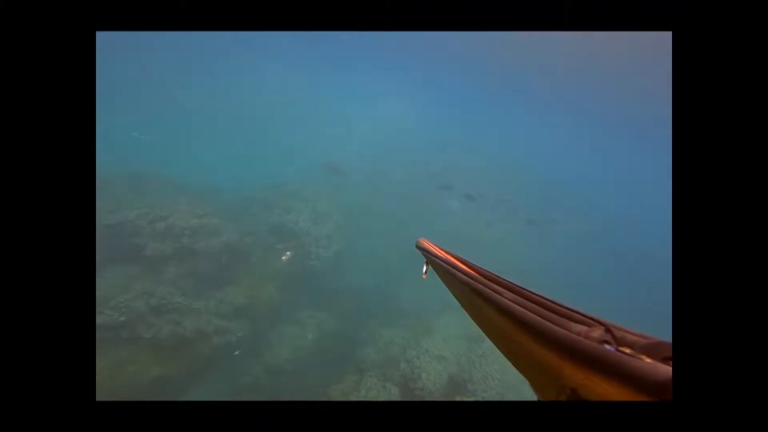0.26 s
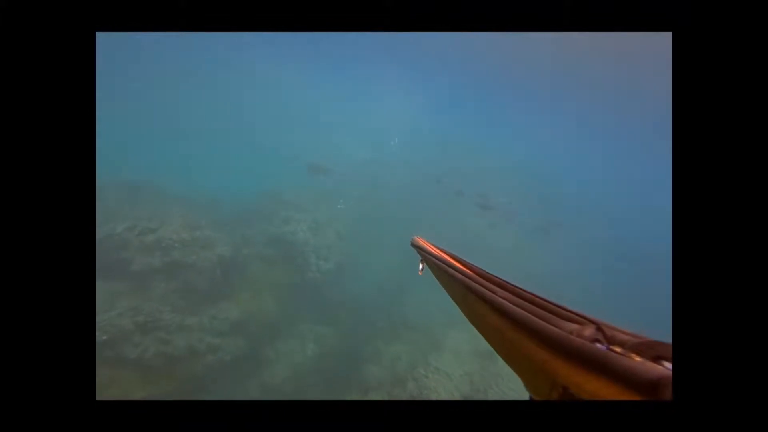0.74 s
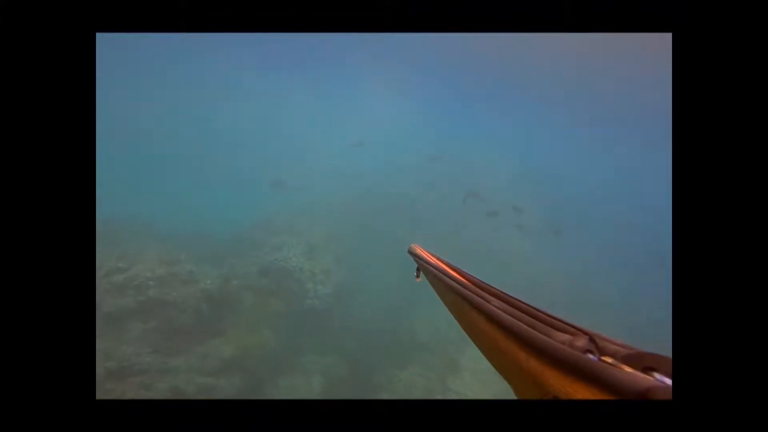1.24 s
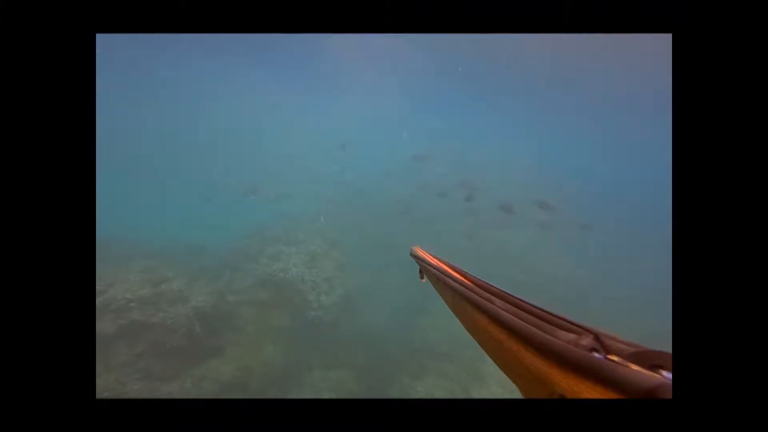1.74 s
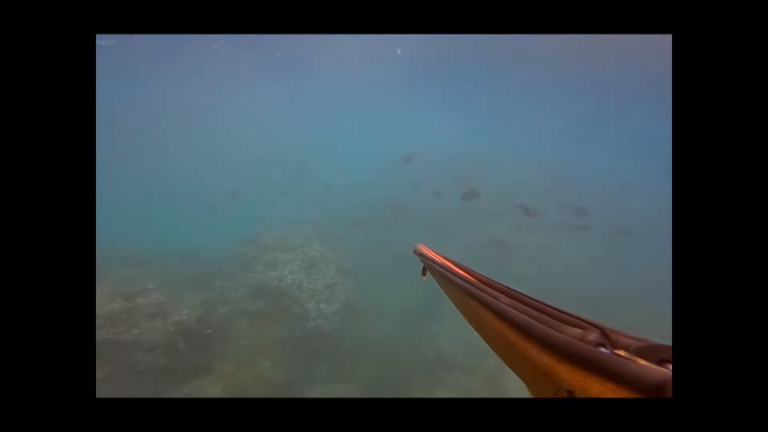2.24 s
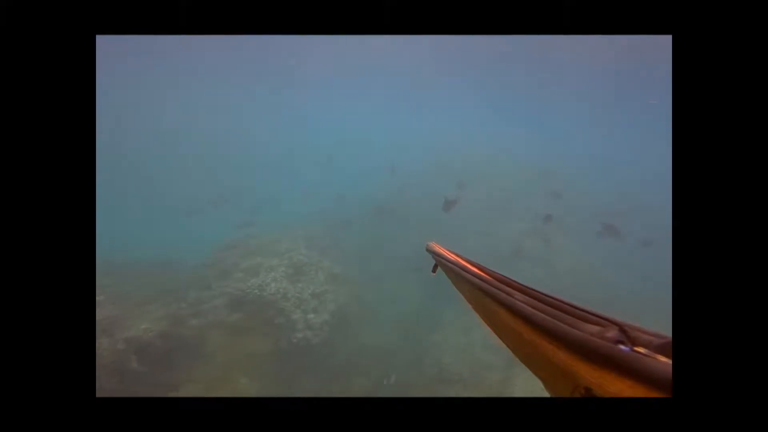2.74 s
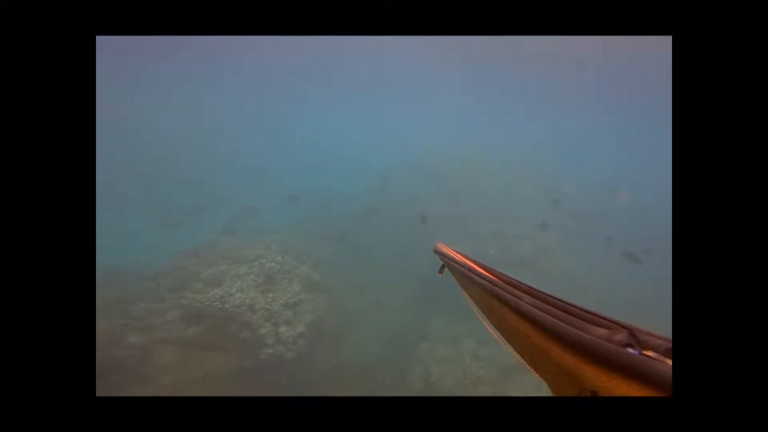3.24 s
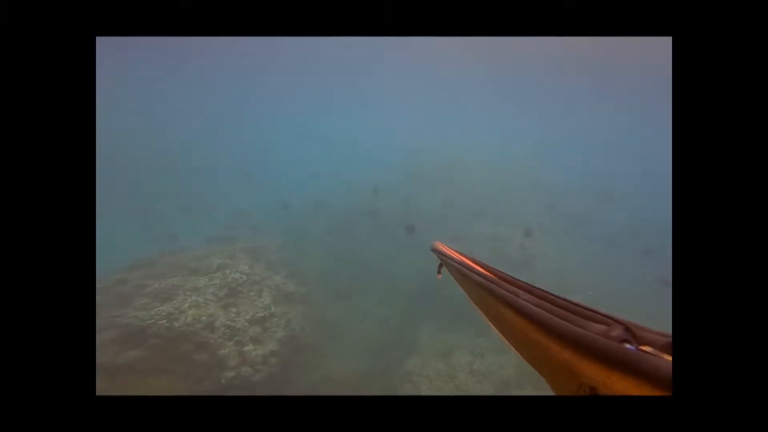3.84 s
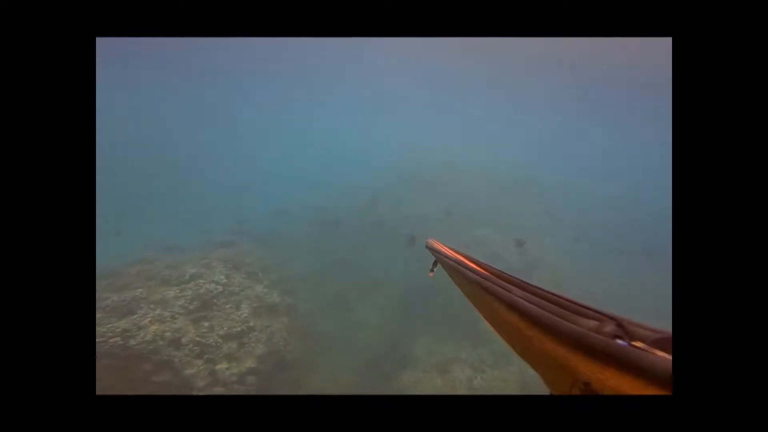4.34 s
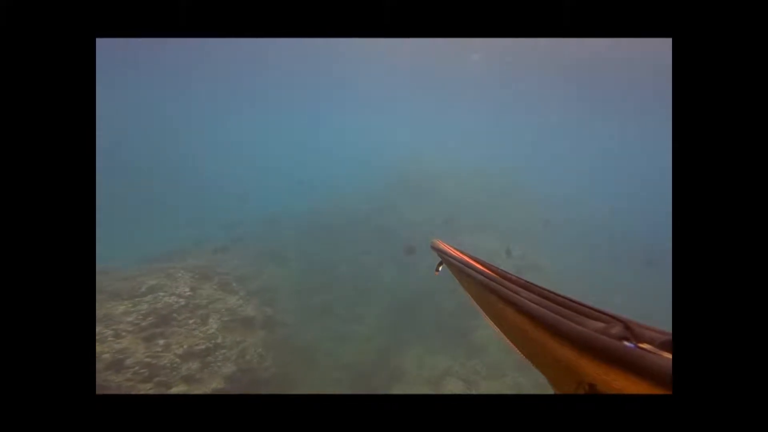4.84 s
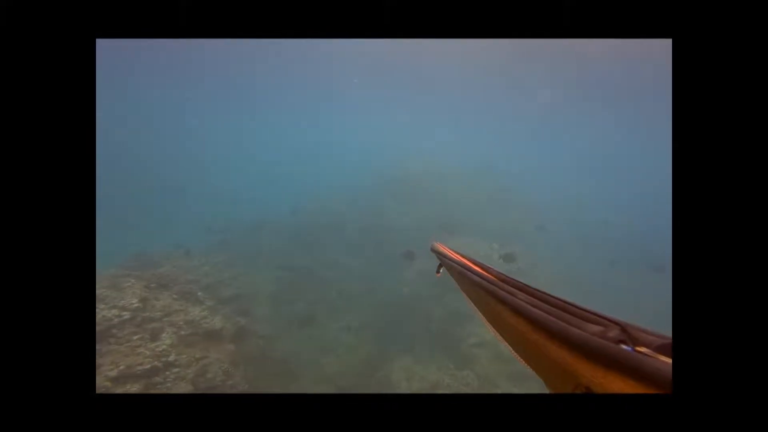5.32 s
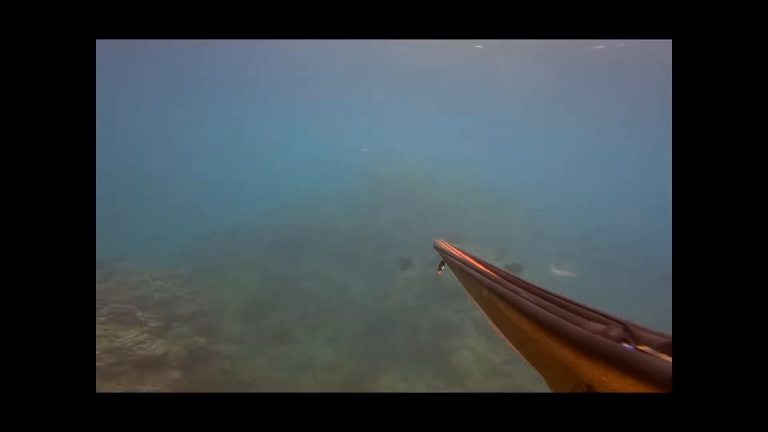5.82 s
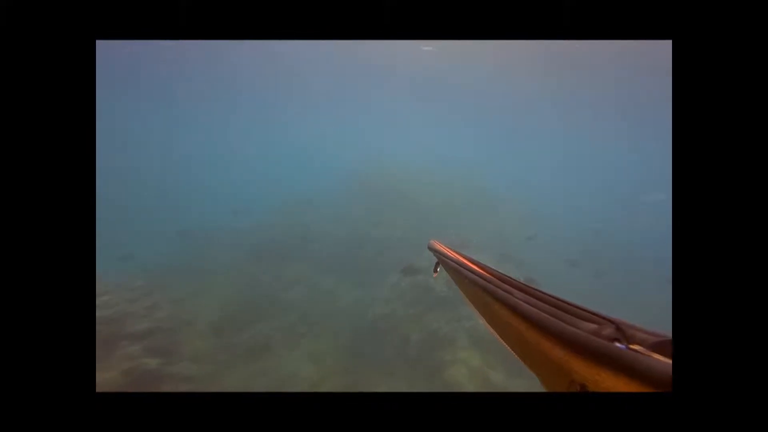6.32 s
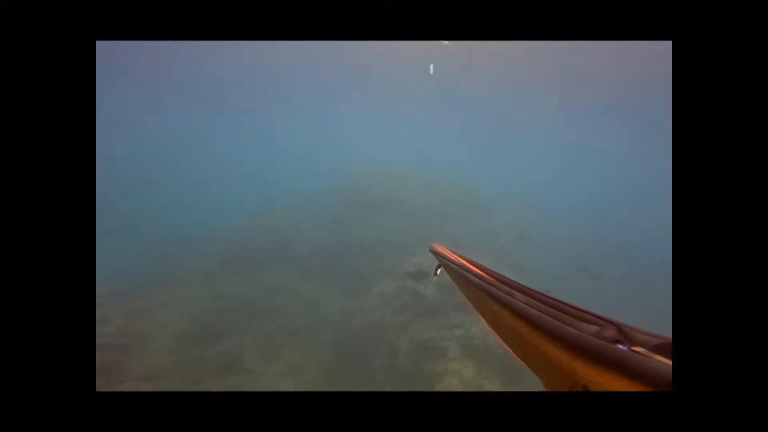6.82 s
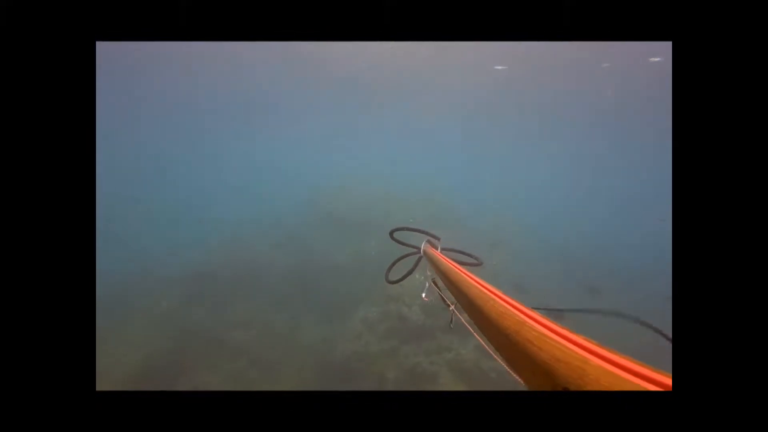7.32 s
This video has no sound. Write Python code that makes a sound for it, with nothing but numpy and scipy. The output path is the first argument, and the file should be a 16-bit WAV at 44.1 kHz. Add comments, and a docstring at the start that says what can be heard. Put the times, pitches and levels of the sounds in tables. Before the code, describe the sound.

Underwater over a reef, heard from inside a sealed camera housing. Snapping shrimp make a steady hissing crackle with sharp near clicks, above a deep wavering throb and soft turbulence. Dull knocks and small bubble blips come now and then. Near the end a close speargun fires: rubbery rasp, hard crack and rattle, a low jolt and a short rush of water, then the crackle fades.

```python
"""Speargun shot over a reef

Underwater, heard by a diver's camera in a sealed housing, through two sound ports. Under it all lie a
deep wavering throb, drone and turbulence. Shrimp snap near and far as noise bursts ringing in the shell.
Dull knocks and small bubbles are dying sines. A rubber-band speargun fires: a rasp of wobbling tones,
a crack and rattle of noise, a recoil jolt and a rush of water, after which the crackle sinks away."""
import sys
import numpy as np
from scipy import signal
from scipy.fft import rfft, irfft, next_fast_len
from scipy.io import wavfile
from scipy.ndimage import uniform_filter1d

SR = 44100
rng = np.random.default_rng(int(sys.argv[2]) if len(sys.argv) > 2 else 0)


def generate_wav(signal):
    """Clip the signal to [-1, 1] and save it as 16-bit WAV at the path in sys.argv[1]."""
    frames = np.transpose(np.atleast_2d(signal))
    scaled = np.clip(frames, -1, 1) * 32767
    pcm = np.round(scaled).astype(np.int16)
    wavfile.write(sys.argv[1], SR, pcm)


N = 333837
OPPOSITE = np.array([[1], [-1]])   # a signal that moves the two ports against each other


def from_db(db):
    """Amplitude factor of a level in dB."""
    return 10 ** (np.asarray(db) / 20)


def rms_one(x):
    """Scale to an RMS of one."""
    return x / np.sqrt(np.mean(x ** 2) + 1e-20)


def in_time(rows):
    """Turn rows that start with a time into one curve of straight lines per remaining column."""
    s, *columns = np.transpose(rows)
    return [np.interp(np.arange(N) / SR, s, c) for c in columns]


def band(x, low_hz, high_hz):
    """Keep the band between two frequencies."""
    sos = signal.butter(2, [low_hz, min(high_hz, .45 * SR)], "band", fs=SR, output="sos")
    return signal.sosfilt(sos, x)


def stereo_noise():
    """White noise, independent in each of two channels."""
    return rng.standard_normal((2, N))


def drift(rate_hz):
    """Random wander of RMS 1, mostly slower than rate_hz."""
    step = 40   # samples between the drawn points
    r = np.exp(-2 * np.pi * rate_hz * step / SR)
    draws = rng.standard_normal(N // step + 2002)
    slow = signal.lfilter([1], [1, -2 * r, r * r], draws)[2000:]
    return np.interp(np.arange(N) / step, np.arange(len(slow)), rms_one(slow))


def add(out, s, sound):
    """Mix a sound in at a time in seconds."""
    at = int(s * SR)
    out[..., at:at + sound.shape[-1]] += sound[..., :N - at]


def rings(events, rise, attack_s, side_db, rough):
    """Each event is a dying, slightly unsteady sine; side_db sets the quarter-cycle part between ports."""
    out, t = np.zeros((2, N)), np.arange(SR // 5) / SR
    for s, level_db, hz, t60 in events:
        wobble = rough * rms_one(uniform_filter1d(rng.standard_normal(len(t)), size=150))
        phase = 2 * np.pi * hz * t * (1 + rise * t / t60) + wobble
        shape = from_db(level_db - 60 * t / t60) * (1 - np.exp(-(t / attack_s) ** 2))
        between = from_db(side_db) * np.cos(phase) * OPPOSITE
        add(out, s, -shape * (np.sin(phase) - between))
    return out


# Gun parts, line and shaft rattling close by. Each row: start in seconds, relative level in dB,
# low thud and treble against the rattle in dB, 60 dB decay of the middle band in seconds.
RATTLE = [(7.164, -32, 7, -4, 0.031), (7.1743, -23, 3, -9.5, 0.031), (7.186, -26.5, 3.5, 4.5, 0.033),
          (7.1944, -20.5, 3, -6, 0.06), (7.2029, -4, -5, -1, 0.03), (7.208, -16, 1.5, -9, 0.02),
          (7.2136, -36, 4, -23, 0.1), (7.2382, -27, 5, -24, 0.054), (7.247, -34, 20, -10, 0.013),
          (7.264, -25.5, 11, -27, 0.019), (7.2694, -34, 5, -12, 0.026), (7.2839, -26, -19, -5.5, 0.034),
          (7.294, -47, 15, -8, 0.056), (7.3013, -44, 13, 5, 0.037), (7.309, -34, -11, -19, 0.02),
          (7.321, -47, 11, -21, 0.035), (7.328, -55, 4, -19, 0.04), (7.344, -45, 9, -1, 0.032),
          (7.3523, -48, -3, -19, 0.021), (7.3635, -39, -14, -12, 0.03), (7.373, -52, 2, 5, 0.029),
          (7.394, -52.5, 9, 8, 0.034), (7.433, -55, 0, 5, 0.029), (7.4553, -53, 10, 1, 0.044),
          (7.4817, -49, 7, -17, 0.03), (7.493, -45, -2, -24, 0.03), (7.5114, -58, -9, -19, 0.027)]


def rattle():
    """Hard parts collide: bursts of noise in low, middle and treble bands, dying faster the higher they are."""
    out, t = np.zeros((3, 2, N)), np.arange(SR // 8) / SR
    for s, level_db, thud_db, treble_db, t60 in RATTLE:
        fall_db = -60 * t / t60
        low_db = thud_db + 9.5 + 0.5 * fall_db
        high_db = treble_db + 7.0 + 1.24 * fall_db
        levels = from_db(level_db + np.array([low_db, 6.0 + fall_db, high_db]))
        add(out, s, rng.standard_normal((3, 2, len(t))) * levels[:, None])
    low, middle, high = out
    body = band(band(low, 435, 1000), 300, 1680)
    thud = from_db(9.5) * band(low[0], 60, 153.7)   # the same at both ports
    clatter = band(band(middle, 1060, 3220), 700, 8600)
    treble = band(band(high, 4300, 6000), 3830, 9000)
    top = from_db(-26) * band(band(high, 9000, 10500), 6000, 11000)
    return body + thud + clatter + treble + top


def shot_crack():
    """The sharp crack of the shot: one very short burst of the highest treble."""
    out, t = np.zeros((2, N)), np.arange(SR // 8) / SR
    burst = band(rng.standard_normal((2, len(t))), 9000, 17000)
    add(out, 7.202, from_db(-43 - 60 * t / 0.039) * burst)
    return out


# Rubber bands whipping forward, close by. Each row: time in seconds, relative level in dB.
BANDS = [(7.165, -73), (7.177, -23), (7.187, -16.5), (7.199, -11.5), (7.209, -12.5), (7.219, -30),
         (7.24, -57), (7.3, -100)]
# Tones of that rasp. Each row: pitch in Hz, wobble rate in Hz, relative level in dB,
# part between the ports against the part alike at both in dB.
BAND_TONES = [(129, 56, 0.5, -7.5), (319.5, 66, -19, 20), (508, 34, -4.5, -6), (702, 45, -1.5, 0),
              (1075, 90, -13, -1), (1760, 130, -20.5, 2)]
BAND_WOBBLE = 0.54   # RMS unsteadiness of the phase (radians)


def rubber_bands():
    """Stretched rubber snaps back: fast phase wobble roughens a handful of tones into a rasp."""
    twang = 0
    for hz, wobble_hz, db, side_db in BAND_TONES:
        phase = 2 * np.pi * hz * np.arange(N) / SR + BAND_WOBBLE * drift(wobble_hz)
        alike, between = np.sqrt(2) * np.sin(phase), np.sqrt(2) * np.cos(phase)
        twang = twang + from_db(db) * (alike + from_db(side_db) * between * OPPOSITE)
    released = np.arange(N) > BANDS[0][0] * SR
    return from_db(in_time(BANDS)[0]) * released * twang / 2


WAKE_S, WAKE_DB, WAKE_T60_S = 7.21, -31.5, 0.35   # start, starting RMS level, 60 dB decay


def shaft_wake():
    """The shaft leaves a smooth rush of water: band noise that dies away."""
    since = np.arange(N) / SR - WAKE_S
    level = (since > 0) * from_db(WAKE_DB - 60 * np.abs(since) / WAKE_T60_S)
    return level * rms_one(band(stereo_noise(), 550, 2300))


# The shot jerks the housing on its mount. Each row: start in seconds, level before the attack in dB,
# pitch in Hz, 60 dB decay in seconds.
RECOIL = [(7.208, -5, 35.1, 0.52)]
# It also rings the hum between the ports. Columns as above.
RECOIL_HUM = [(7.198, -31.5, 335, 0.14)]


def recoil():
    """The jolted mount swings as a dying low sine, with an unsteady hum mostly between the ports."""
    jolt = rings(RECOIL, rise=0, attack_s=0.0029, side_db=-15, rough=0)
    return jolt + rings(RECOIL_HUM, rise=0, attack_s=0.0051, side_db=19, rough=0.93)


# Deep throb of the housing on its mount, swelling and fading irregularly. Each row: time in seconds,
# relative level in dB, pitch in Hz.
THROB = [(0.0, -30, 38.2), (0.12, -42, 38.1), (0.17, -25.5, 36.8), (0.53, -36, 34.2), (0.63, -27.5, 37.9),
         (0.86, -35.5, 39.5), (1.01, -25.5, 38.37), (1.16, -33, 38.43), (1.43, -18, 37.06),
         (1.5, -24, 36.93), (1.62, -22, 42.7), (1.75, -24.5, 38.2), (1.87, -19.5, 38.5), (1.98, -29, 38.04),
         (2.04, -18.5, 38.4), (2.09, -24.5, 38.74), (2.26, -31, 36.18), (2.38, -15.5, 37.2),
         (2.46, -32, 36.27), (2.51, -23.5, 34.88), (2.61, -40.5, 37.53), (2.74, -21, 34.56),
         (2.78, -27.5, 34.25), (2.91, -16, 37.23), (2.99, -29.5, 37.24), (3.16, -19, 37),
         (3.27, -20.5, 38.37), (3.6, -28, 38.3), (3.65, -18, 38.63), (3.73, -22, 42.33),
         (3.79, -31.5, 41.9), (3.9, -21, 41.4), (4.07, -31.5, 40.3), (4.13, -44, 42.27), (4.26, -21, 42.32),
         (4.32, -36, 42.2), (4.49, -21, 42.9), (4.74, -37, 38.94), (4.81, -25, 39.67), (4.91, -24.5, 39.05),
         (4.98, -23.5, 37.16), (5.23, -18.5, 35.61), (5.27, -27.5, 35.5), (5.37, -22.5, 35.7),
         (5.99, -21.5, 35.67), (6.13, -24.5, 32.78), (6.16, -31.5, 32.9), (6.41, -25, 32.95),
         (6.47, -15, 36.27), (6.51, -17.5, 39.73), (6.66, -26.5, 44.84), (6.7, -19, 44.35),
         (6.77, -34.5, 43.62), (6.85, -25.5, 43.91), (7.0, -20, 39.47), (7.1, -22.5, 40.0),
         (7.21, -13, 38.2), (7.29, -11, 35.58), (7.38, -29.5, 35.26), (7.57, -32, 34.94)]
# The recoil takes over from the throb. Each row: time in seconds, change of the throb in dB.
JERK = [(7.19, 0.5), (7.21, -30), (7.31, -30), (7.37, 0.5)]
WAVER_DEPTH, WAVER_LOW_HZ, WAVER_HIGH_HZ = 0.42, 5.3, 18.3   # the throb also wavers at random


def throb():
    """The housing rocks on its mount: a wandering low sine of wavering strength, plus low band noise."""
    throb_db, throb_hz = in_time(THROB)
    steady = np.sqrt(2) * np.sin(2 * np.pi * np.cumsum(throb_hz) / SR + 0.45 * drift(8.6))
    # one extra second lets the narrow filter settle
    waver = band(rng.standard_normal(N + SR), WAVER_LOW_HZ, WAVER_HIGH_HZ)[SR:]
    waver = np.minimum(rms_one(waver), 1.2)
    rumble = rms_one(band(rng.standard_normal(N), 29.0, 48.9))
    motion = 0.93 * steady * (1 + WAVER_DEPTH * waver) + 0.37 * rumble
    return from_db(throb_db + in_time(JERK)[0]) * motion


# Flow round the housing. Each row: time in seconds, relative level of the turbulence in dB,
# relative level of its drone near 100 Hz in dB.
FLOW = [(0.0, -50.5, -70), (0.15, -49, -56), (0.4, -45.5, -50), (0.91, -41.5, -44), (1.05, -33, -37),
        (1.28, -36.5, -51), (1.62, -32.5, -45), (1.94, -39.5, -46), (2.3, -37.5, -37.5), (2.8, -40.5, -51),
        (3.08, -40, -52.5), (3.22, -40.5, -37), (3.44, -40, -43.5), (4.51, -43.5, -45.5), (4.68, -44, -49),
        (4.98, -48, -54), (5.1, -40, -48), (5.63, -37, -43.5), (5.86, -37, -41.5), (5.97, -36.5, -45),
        (6.26, -40, -53), (6.7, -38.5, -62), (6.89, -46.5, -47), (7.08, -56, -51), (7.25, -31, -46),
        (7.57, -48.5, -42.5)]
# Colour of the turbulence. Each row: frequency in Hz, relative level in dB.
TURBULENCE = [(14, -34), (24, -1), (38, -3.5), (49, -3.5), (57, -8.5), (75, -24), (108, -15), (183, -28),
              (275, -35.5), (335, -37.5), (380, -35.5), (490, -65.5), (840, -120)]


def flow():
    """Low sound of the housing in the flow: the throb, lumpy coloured-noise turbulence, a narrow-band drone."""
    rough_db, drone_db = in_time(FLOW)
    noise = stereo_noise()
    hz = np.arange(N // 2 + 1) * SR / N + 1   # the 1 avoids log of zero
    colour_hz, colour_db = np.transpose(TURBULENCE)
    colour = from_db(np.interp(np.log(hz), np.log(colour_hz), colour_db))
    mid, side = band(irfft(rfft(noise) * colour, N), 59.5, 520)
    drone = rms_one(band(rng.standard_normal(N), 89.1, 109.6))
    drone = from_db(drone_db + 2.0 + 2.6 * drift(5.3)) * drone
    lumps = from_db(rough_db + 0.82 + 2.63 * drift(12.2))
    side = rms_one(side) + 0.91 * rms_one(band(noise[1], 24, 55))   # the mount also rocks sideways
    side = lumps * from_db(-5.0) * side - 0.17 * drone
    mid = throb() + lumps * rms_one(mid) + drone
    return mid * from_db([[-1.2], [1.2]]) + side * OPPOSITE


# Dull knocks on the housing. Each row: start in seconds, relative level in dB.
KNOCKS = [(1.069, -21.5), (1.199, -32), (1.328, -36), (2.34, -28), (2.987, -25), (3.0694, -13.5),
          (4.292, -32), (4.6515, -12), (5.495, -21), (5.816, -26), (6.03, -17.5), (6.325, -29)]
# What a knock rings with. Each row: pitch in Hz, relative level in dB, 60 dB decay in seconds.
KNOCK_MODES = [(100.6, 1.5, 0.067), (151, 0.5, 0.056), (236.4, -1.5, 0.061), (285, -7, 0.074)]
KNOCK_SOFT_HZ = 340   # the contact is soft: ringing fades out above this


def knocks():
    """Each soft contact sets off the same few low dying modes of the housing."""
    out = 0
    for hz, mode_db, t60 in KNOCK_MODES:
        events = [(s, db + mode_db, hz, t60) for s, db in KNOCKS]
        out = out + rings(events, rise=0, attack_s=0.0024, side_db=-29, rough=0)
    return band(out, 43, KNOCK_SOFT_HZ)


# Small bubbles near the ports. Each row: start in seconds, level before the attack in dB,
# starting pitch in Hz, 60 dB decay in seconds.
BUBBLES = [(0.385, -41, 574, 0.094), (0.564, -31, 587, 0.042), (0.661, -36, 1840, 0.073),
           (1.025, -38.5, 752, 0.055), (1.07, -41, 2080, 0.044), (1.073, -24.5, 643, 0.029),
           (1.145, -38, 1670, 0.055), (1.151, -38, 1280, 0.039), (1.152, -37.5, 735, 0.091),
           (1.195, -38, 1830, 0.055), (1.199, -31, 486, 0.024), (1.215, -41, 1750, .07),
           (1.53, -40, 392, 0.2), (1.653, -35, 402, 0.053), (1.662, -36, 658, 0.057),
           (1.905, -36, 660, 0.041), (2.335, -30, 729, 0.033), (3.701, -28, 790, 0.019),
           (3.701, -31.5, 305, 0.074), (3.821, -33, 450, 0.032), (3.93, -35.5, 436, 0.04),
           (3.978, -37.5, 689, 0.045), (4.161, -30, 535, 0.021), (4.221, -36, 670, 0.028),
           (4.23, -43.5, 334.5, 0.17), (4.292, -34, 540, 0.04), (4.408, -33, 665.4, 0.037),
           (4.437, -35, 667.6, 0.033), (5.04, -41.5, 1054, 0.051), (5.152, -24, 2347, 0.018),
           (5.524, -30, 625, 0.025), (5.819, -19.5, 558.4, 0.022), (5.836, -31.5, 1800, 0.03),
           (5.878, -36, 1494, 0.065), (5.896, -25.5, 510, 0.044), (5.95, -28.5, 1768, 0.063),
           (5.953, -33, 489, 0.062), (6.032, -25, 1300, 0.064), (6.035, -32, 1570, 0.056),
           (6.039, -28, 480, 0.065), (6.063, -30, 2440, 0.041), (6.064, -29, 516, 0.1),
           (6.063, -24, 2030, 0.025), (6.1, -43, 503, 0.2), (6.2, -46, 470.6, 0.31),
           (6.365, -42.5, 1228, 0.072), (6.55, -38, 2057, 0.081), (6.55, -41.5, 1234, 0.07),
           (7.402, -45, 4149, 0.032), (7.41, -47, 4100, 0.026), (7.426, -52, 4070, 0.031)]
PUFF_DB, PUFF_LONGER = -14, 2.1   # stirred water against its bubble: level, and ratio of decay times


def stir():
    """Water stirs round each bubble and settles more slowly: a puff of noise round its pitch."""
    out, t = np.zeros((2, N)), np.arange(SR // 5) / SR
    for s, level_db, hz, t60 in BUBBLES:
        puff = rms_one(band(rng.standard_normal((2, len(t))), hz / 1.16, hz * 1.18))
        level = from_db(level_db + PUFF_DB - 60 * t / (t60 * PUFF_LONGER))
        add(out, s, puff * level * np.minimum(t / 0.0023, 1))
    return out


def bubbles():
    """Each bubble blips as an unsteady dying sine, its pitch sinking slightly, in a puff of stirred water."""
    return rings(BUBBLES, rise=-0.02, attack_s=0.0017, side_db=-6.0, rough=0.33) + stir()


# Loud near shrimp. Each row: start in seconds, relative level in dB, low and treble against the body in dB.
SNAPS = [(0.0663, -33.5, -19, -22), (0.099, -24.5, -17, -21), (0.1303, -33.5, -18, -3),
         (0.207, -33, -32, -4), (0.2658, -38, -13, -2), (0.3807, -36, -25, -6), (0.5, -34, -13, -4),
         (0.524, -29.5, -32, -16), (0.5525, -29.5, -19, -1), (0.7553, -37, -14, -16),
         (0.8535, -34, -17, -8), (0.8855, -32.5, -21, -4.5), (0.9664, -38, -7, -11), (1.0732, -32, -7, -15),
         (1.1461, -30, -10, -13), (1.1957, -31, -6.5, -5), (1.2268, -30, -13, -19), (1.2383, -25, -29, -28),
         (1.2684, -30.5, -32, -12), (1.2982, -33, -22, -7), (1.3252, -36, -20, 1), (1.337, -31, -21, -4),
         (1.4178, -33.5, -9, -21), (1.4321, -34, -12, -23), (1.4587, -32, -17, -24),
         (1.5002, -27.5, -16, -13), (1.5443, -34, -17, -23), (1.5676, -28.5, -20, -10),
         (1.6242, -30, -18, -15), (1.6464, -28, -9, -7.5), (1.7736, -34, -21, -21), (1.8659, -35, -14, -2),
         (1.976, -36, -19, -7), (1.9987, -31, -17, -4.5), (2.0315, -37, -15, -1), (2.1107, -15, -13.5, -23),
         (2.1349, -43, -23, -16), (2.159, -27.5, -19, -10), (2.2427, -36, -23, -7),
         (2.3117, -30.5, -18, -4), (2.3247, -32, -14, -1), (2.3906, -38, -16, -12), (2.412, -38.5, -19, 2),
         (2.4565, -33, -19, -5), (2.4681, -37, -16, -19), (2.5937, -12.5, -20.5, -9.5),
         (2.7069, -36, -29, -16), (2.7435, -30.5, -22, -17), (2.7717, -32, -21, -12),
         (2.7951, -31, -20, -6.5), (2.904, -26, -27, -17), (2.9169, -34.5, -19, -4), (2.9902, -38, -14, -3),
         (3.0715, -31.5, -14, -22), (3.1646, -33, -22, -9), (3.3508, -39, -14, -20),
         (3.4384, -32, -11, -21), (3.4599, -20, -4.5, -20), (3.6084, -36, -10, -28),
         (3.6901, -31.5, -16, -16), (3.7211, -33, -13, -2), (3.7557, -29, -17, -22),
         (3.8945, -37, -12, -6.5), (4.1483, -35, -9, -2), (4.1588, -27.5, -13, -18),
         (4.2549, -30, -13, -16), (4.2648, -37, -24, -13), (4.274, -30.5, -6.5, -24),
         (4.3759, -35, -8, -21), (4.4224, -44, -14, -20), (4.4824, -26, -21, -11), (4.4982, -28, -17, -13),
         (4.5124, -30.5, -20, -9), (4.5237, -27, -12.5, -16), (4.555, -25, -16, -10.5),
         (4.595, -32, -2, -20), (4.6469, -28, -19, -15), (4.8341, -32, -7.5, -12), (4.9057, -28, -19, -17),
         (4.9327, -28, -26, -25), (4.9513, -20, -5, -12), (4.9927, -33, -24, -11), (5.0595, -38, -10, -11),
         (5.0743, -35, -25, -27), (5.0963, -30, -18, -8.5), (5.1531, -32, -6.5, -22),
         (5.1887, -27, -17, -2), (5.2223, -38, -19, -9), (5.2325, -40, -20, 0), (5.2963, -36, -21, -14),
         (5.3128, -37, -18, -9), (5.346, -39, -14, -7), (5.4362, -31.5, -9, -11), (5.5378, -25, -15, -9.5),
         (5.6007, -32, -16, -21), (5.6173, -17.5, -16, -21.5), (5.6734, -28.5, -19, -7.5),
         (5.709, -35, -16, -19), (5.7323, -30, -20, -6), (5.751, -36, -22, -8), (5.7802, -36, -11, -15),
         (5.7963, -27.5, -12.5, -21), (5.8672, -37, -4, -2), (5.9747, -32, -16, -10.5),
         (6.0159, -16, -17, -16.5), (6.061, -38, 2, -28), (6.134, -34, -15, -17), (6.1987, -32, -7, -21),
         (6.2117, -29.5, -11, -24), (6.229, -35, -18, -6), (6.3173, -32.5, -11, 0),
         (6.5109, -25.5, -17, -7), (6.5571, -29.5, -14, -5.5), (6.666, -33, -19, -15),
         (6.7597, -36.5, -26, -2), (6.8168, -36.5, -19, -2), (6.8759, -30, -22, -14),
         (6.914, -30, -16, -15), (6.9281, -34.5, -16, -2), (7.151, -30.5, -31, -17)]
# Bands in which a near snap rings, low to top. Each row: lower and upper edge in Hz.
SNAP_RINGS = [(1150, 2146), (2350, 3680), (4300, 7530), (8500, 13000)]
# Softer near shrimp at random times until the shot. Mean, then spread, of relative level in dB,
# low and treble against the body in dB; the draws are clipped to -2 to 1.2 spreads.
SOFT_MEAN_DB = [-43.5, -21, -14]
SOFT_SPREAD_DB = [2, 12, 10.5]
SOFT_SNAPS, SHOT_S = 30, 7.16   # how many, and until what time in seconds
SNAP_SPREAD_S, SURFACE_ECHO_S, SURFACE_ECHO_DB = 0.00052, 0.0035, -12.5


def snaps():
    """Each snap is a swarm of close arrivals, evened band by band, and its upside-down return from the surface."""
    out, t = np.zeros((2, N)), np.arange(700) / SR
    chance = np.clip(rng.standard_normal((SOFT_SNAPS, 3)), -2, 1.2)
    soft = np.array(SOFT_MEAN_DB) + np.array(SOFT_SPREAD_DB) * chance
    soft_rows = np.column_stack([SHOT_S * rng.random(SOFT_SNAPS), soft])
    s, level_db, low_db, treble_db = np.vstack([soft_rows, SNAPS]).T
    x = t / SNAP_SPREAD_S
    swarms = rng.standard_normal((len(s), len(t))) * x * np.exp(-x)
    directions = rng.standard_normal(len(s))
    snap = 0
    ring_db = [low_db + 14.5, 0 * s, treble_db + 17.5, treble_db + 13]
    for (low, high), db in zip(SNAP_RINGS, ring_db):
        part = band(band(swarms, low, high), low, high)
        part = part / np.abs(part).max(axis=1, keepdims=True)
        snap = snap + from_db(level_db + db)[:, None] * part
    for start, wave, way in zip(s, snap, directions):
        both = wave * [[1], [way]]   # the drive, and its share by direction
        add(out, start, both)
        add(out, start + SURFACE_ECHO_S, -from_db(SURFACE_ECHO_DB) * both)
    return out


def crackle(per_s, spread_db, smear_s):
    """Random snaps in flurries, mostly small, each from a direction of its own; reef echoes smear them."""
    sizes = from_db(spread_db * np.minimum(rng.exponential(1, N), 3.5)) * rng.choice([-1, 1], N)
    clicks = sizes * (rng.random(N) < per_s * from_db(3.0 * drift(20)) / SR)
    echoes = 0.16 * rng.standard_normal(500) * np.exp(-np.arange(500) / SR / smear_s)
    echoes[0] = 1   # the direct arrival
    both = clicks * np.array([np.ones(N), rng.standard_normal(N)])
    return rms_one(signal.oaconvolve(both, echoes[None], axes=1)[:, :N])


def gurgle():
    """Small pockets of air shift along the shell; each rings a few cycles at one of six pitches."""
    grains = crackle(per_s=280.0, spread_db=6.0, smear_s=0.0012)
    dealt = rng.integers(0, 6, N)[np.arange(N) // 400]   # one pitch for each 400 samples
    out = 0
    for k, hz in enumerate(np.geomspace(510, 790, 6)):
        turn = uniform_filter1d(1. * (dealt == k), size=200)
        out = out + band(grains * turn, hz / 1.06, hz * 1.06)
    return rms_one(out)


# Modes of the shell. Each row: pitch in Hz, width in Hz, then signed gains: at both ports alike,
# between the ports, and between the ports from scattered directions.
HOUSING = [(380, 94, 1.02, -0.65, 1.3), (524, 550, 0.33, 0.24, 0.0), (670, 160, -0.03, 0.31, 0.03),
           (746, 91, -0.84, -1.5, 1.0), (911, 402, -0.301, -0.189, -0.837),
           (1214, 187, -0.209, -0.259, 0.152), (1489, 108, -0.232, 0.155, -0.015),
           (1721, 319, 0.506, -0.157, -0.022), (1989, 60, 0.075, -0.055, -0.076),
           (2616, 271, -1.109, -0.323, 0.241), (3257, 904, 2.951, 0.094, -0.607),
           (3581, 1493, -3.29, 0.08, 0.609), (3989, 1261, 1.71, -0.119, -0.279),
           (4597, 570, 0.104, 0.111, -0.142), (4943, 206, -0.013, -0.154, -0.144),
           (5435, 631, 0.57, -0.02, 0.18), (6279, 471, 0.422, -0.195, 0.191),
           (6664, 473, 0.002, 0.171, 0.2), (7414, 1985, 0.163, -0.061, 0.144),
           (7890, 619, -0.177, 0.303, 0.202), (8881, 839, -0.094, -0.023, -0.008),
           (12629, 3027, -0.08, 0.148, -0.04)]
WALL_HZ = 6970   # the thick wall dulls the top from here


def housing(drive, scattered):
    """The shell's modes move both ports together and, a quarter cycle apart, against each other."""
    size = next_fast_len(N + 4096)
    hz = np.arange(size // 2 + 1) * SR / size
    near, far = rfft(drive, size), rfft(scattered, size)
    mid = side = 0
    for mode_hz, width, alike, between, scatter in HOUSING:
        mode = width / (mode_hz ** 2 - hz ** 2 + 1j * hz * width)
        mid = mid + alike * 1j * hz * mode * near
        side = side + mode_hz * mode * (between * near + scatter * far)
    wall = 1 / (1 + np.sqrt(2) * 1j * hz / WALL_HZ - (hz / WALL_HZ) ** 2) ** 2
    return irfft([(mid + side) * wall, (mid - side) * wall], size)[:, :N]


# The reef, sinking away after the shot. Each row: time in seconds, then relative levels in dB of
# the crackle, the wash of water on the shell, and the hum between the ports.
REEF = [(0.0, -51.5, -50.5, -87), (0.6, -49.5, -53.5, -71), (0.8, -51, -59.5, -77), (1.09, -48, -47, -59),
        (1.41, -49, -58, -61), (1.68, -48, -48.5, -52), (2.05, -51.5, -60, -63), (2.45, -49, -54, -57),
        (3.3, -50.5, -52.5, -63), (4.05, -49.5, -60.5, -66), (4.2, -48.5, -53, -80), (4.9, -48, -58.5, -74),
        (5.3, -49, -56.5, -64), (5.9, -48, -48.5, -62), (6.5, -48, -52.5, -71), (7.12, -52, -62.5, -74),
        (7.22, -44.5, -40, -59.5), (7.3, -52.5, -39.5, -68), (7.36, -64, -52, -66), (7.42, -72, -60, -65),
        (7.46, -69, -51, -68), (7.488, -65.5, -41, -70), (7.52, -74, -61, -79), (7.57, -82, -84, -82)]
# Low, body and treble of the nearer crackle. Each row: lower and upper edge in Hz.
SNAP_BANDS = [(900, 2780), (2200, 4800), (4400, 7600)]
CRACKLE_SWAY_DB, WASH_SLOSH_DB, WASH_SLOSH_HZ = 1.5, 4, 8.8


def reef():
    """Far crackle blurred into hiss, nearer crackle by bands, near snaps and wash all ring the shell; a hum adds."""
    crackle_db, wash_db, hum_db = in_time(REEF)
    distant = band(crackle(per_s=120., spread_db=4.5, smear_s=0.002), 450, 11000)
    blur = band(stereo_noise(), 500, 9900)
    shrimp = band(0.62 * distant + 0.54 * blur, 780, 20000)
    shrimp += 0.48 * band(stereo_noise(), 9750, 17000)   # a thin hiss on top
    for (low, high), share in zip(SNAP_BANDS, [.5, .55, .7]):
        shrimp += share * band(crackle(per_s=250., spread_db=2.5, smear_s=0.0016), low, high)
    shrimp *= from_db(crackle_db + 14 + CRACKLE_SWAY_DB * drift(4.6))
    wash = 0.45 * gurgle() + 0.5 * rms_one(band(stereo_noise(), 411, 874))
    slosh_db = WASH_SLOSH_DB * np.minimum(drift(WASH_SLOSH_HZ), 1.4)
    wash *= from_db(wash_db + 3.0 + slosh_db)
    # a narrow hum wavers, opposite at the two ports
    hum = rms_one(band(band(rng.standard_normal(N), 336, 400), 336, 400))
    hum = from_db(hum_db + 4.5 + 3.0 * drift(6.7)) * hum * OPPOSITE
    return housing(*(shrimp + wash + snaps())) + hum


def scene():
    """The shot, the flow and knocks on the housing, the bubbles and the reef, summed at the two ports."""
    shot = rattle() + shot_crack() + rubber_bands() + shaft_wake() + recoil()
    return shot + flow() + knocks() + bubbles() + reef()


CUTOFF_HZ = 16290   # stopband edge


def record(dry):
    """Peaks are rounded, the top is cut."""
    rounded = 1.088 * np.tanh(dry / 1.094)
    return signal.sosfilt(signal.cheby2(18, 70, CUTOFF_HZ, fs=SR, output="sos"), rounded)


dry = scene()
out = record(dry)
generate_wav(out)
```